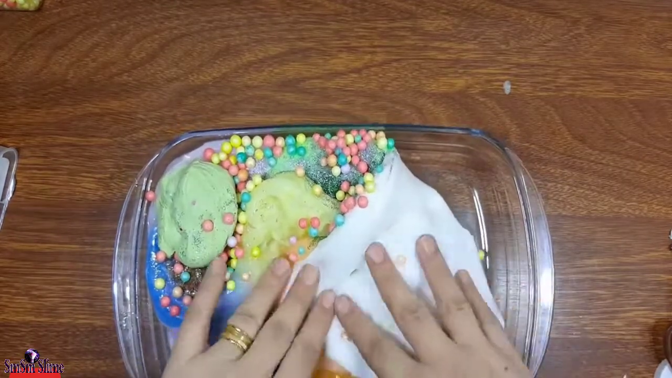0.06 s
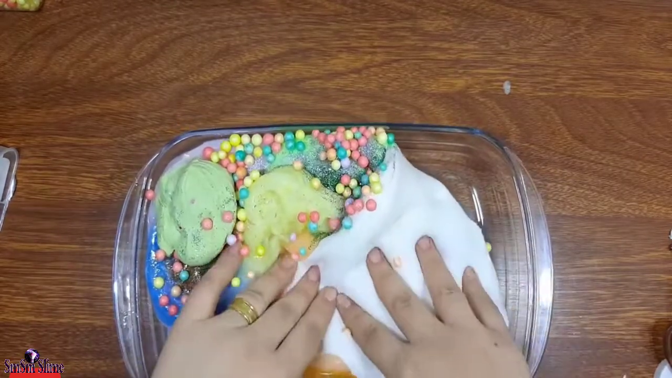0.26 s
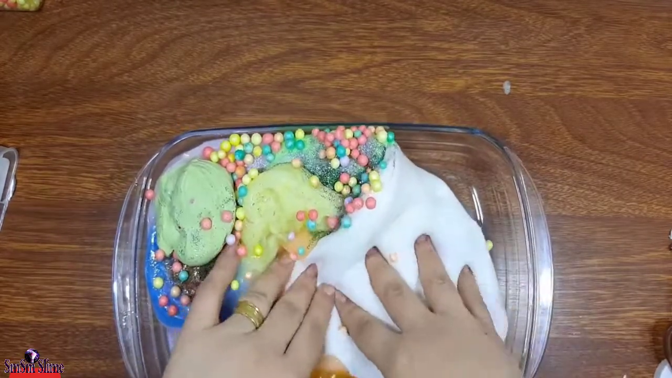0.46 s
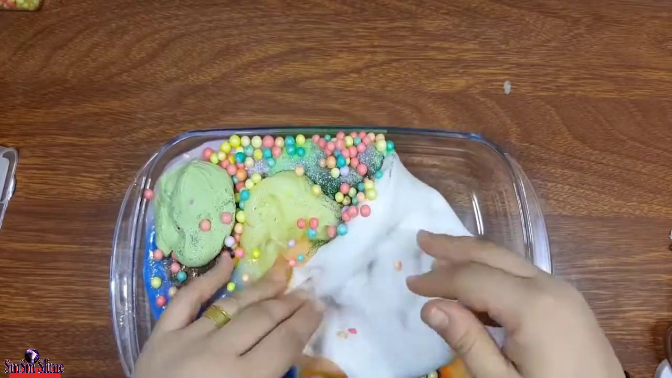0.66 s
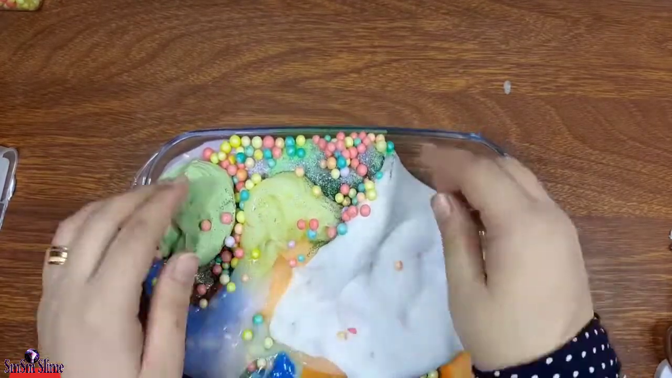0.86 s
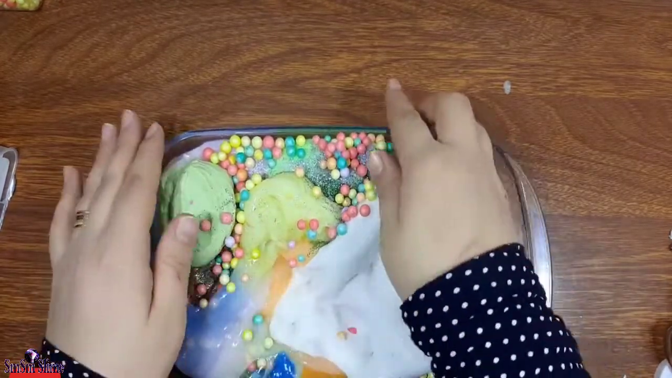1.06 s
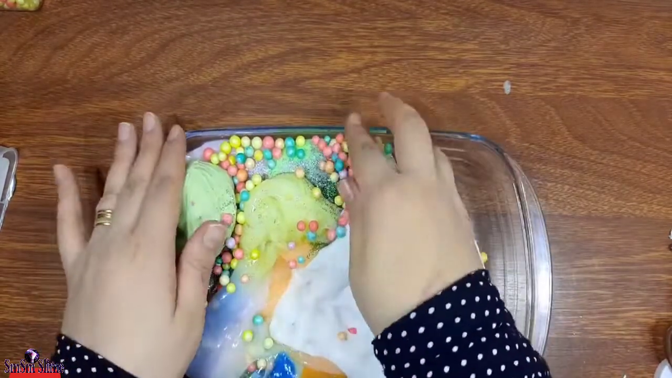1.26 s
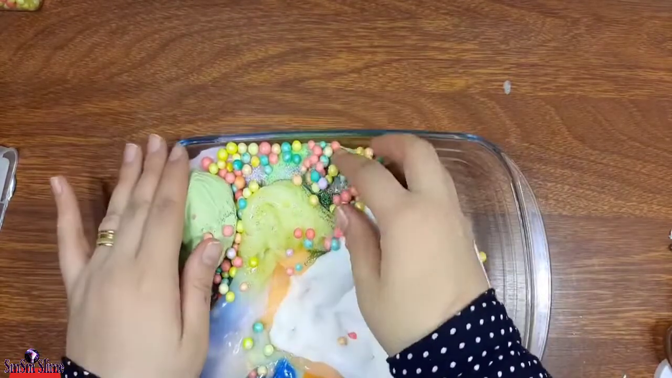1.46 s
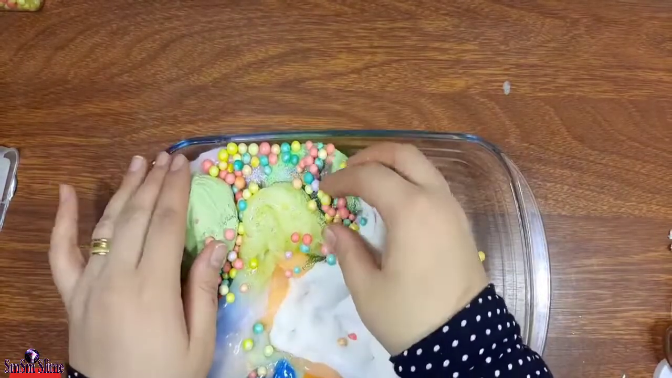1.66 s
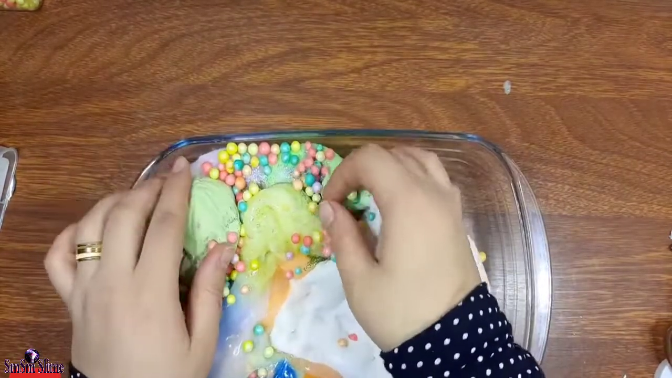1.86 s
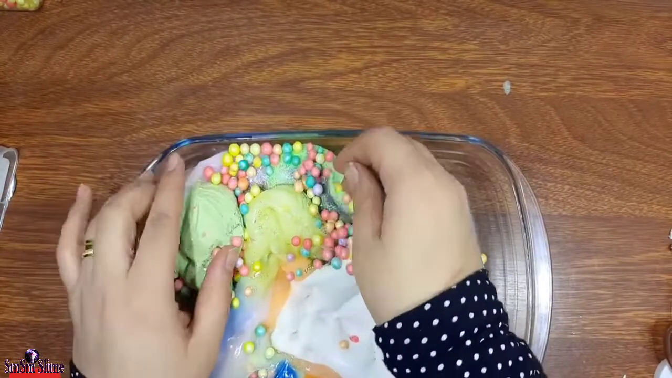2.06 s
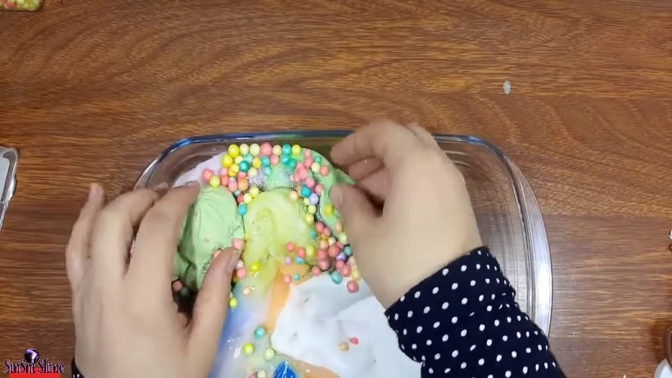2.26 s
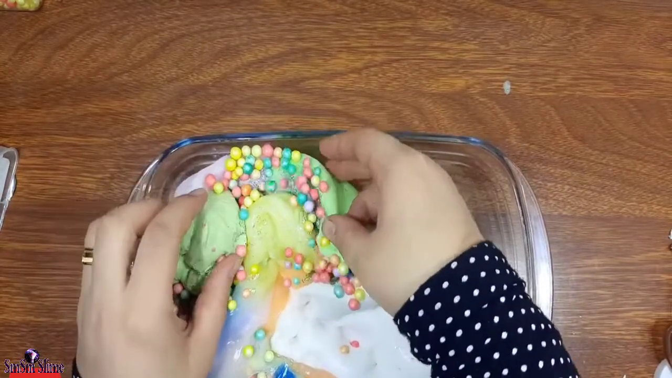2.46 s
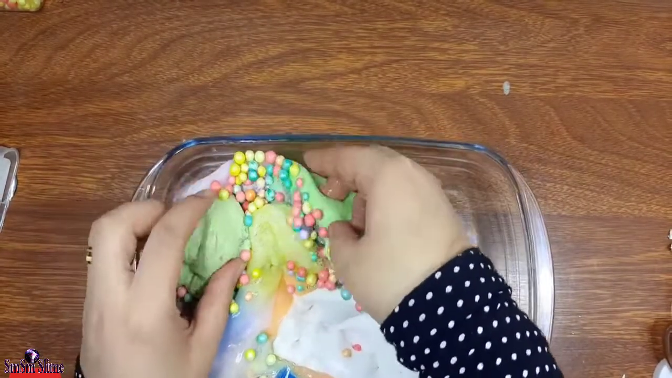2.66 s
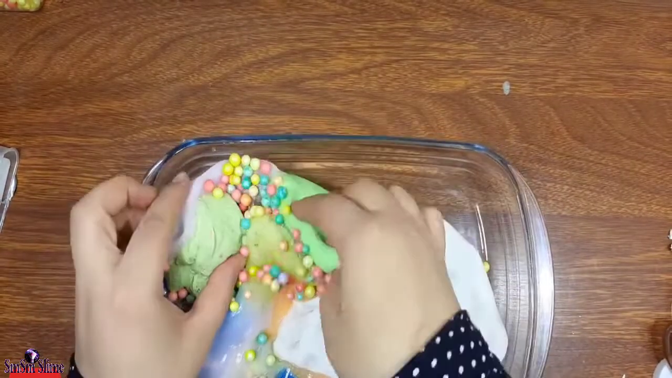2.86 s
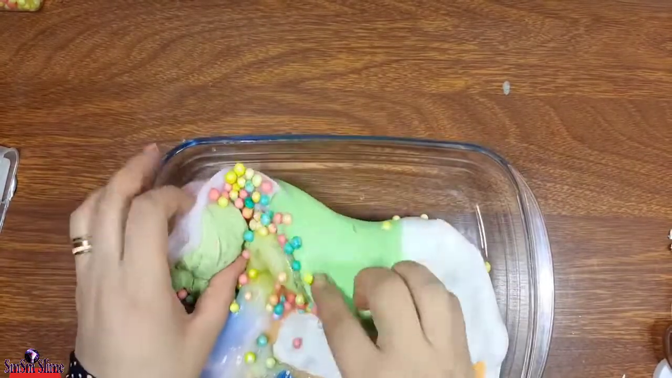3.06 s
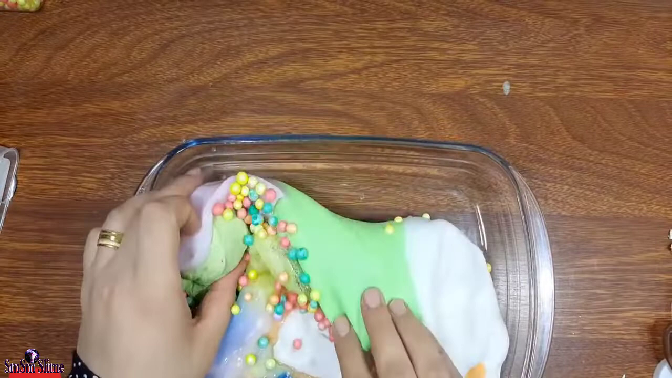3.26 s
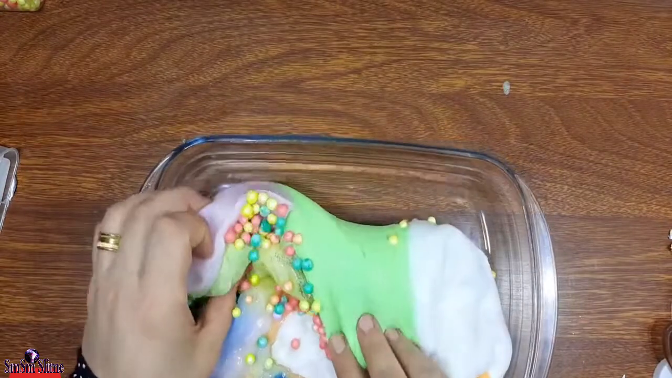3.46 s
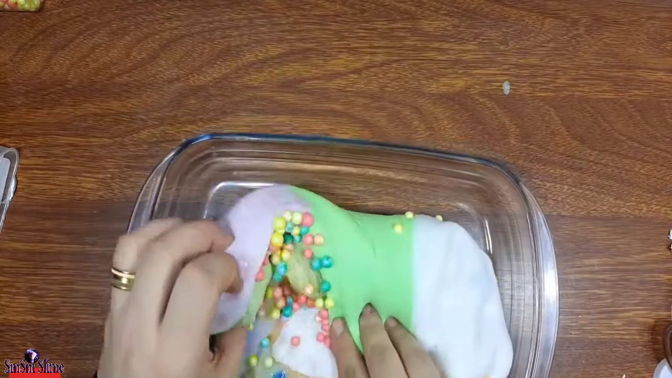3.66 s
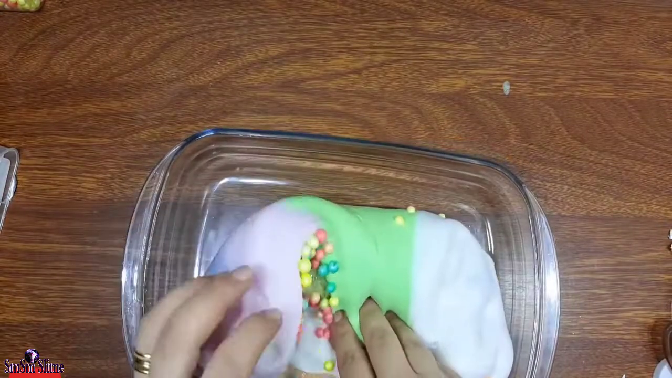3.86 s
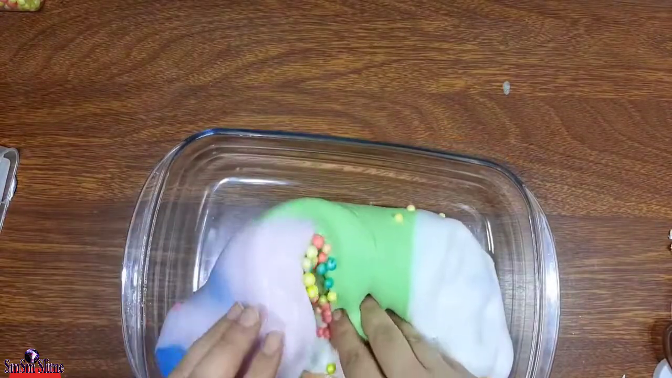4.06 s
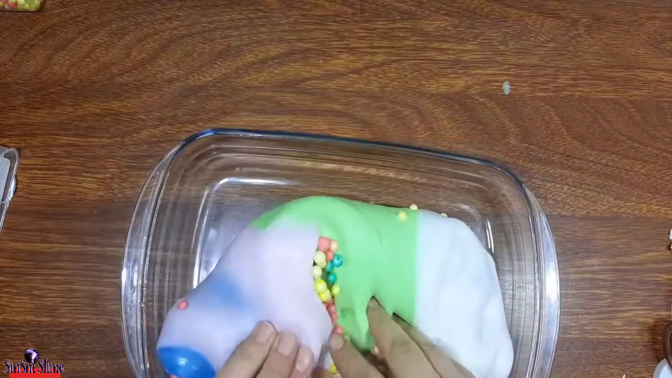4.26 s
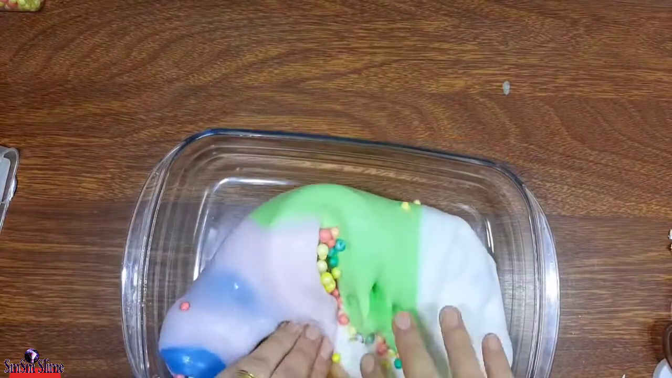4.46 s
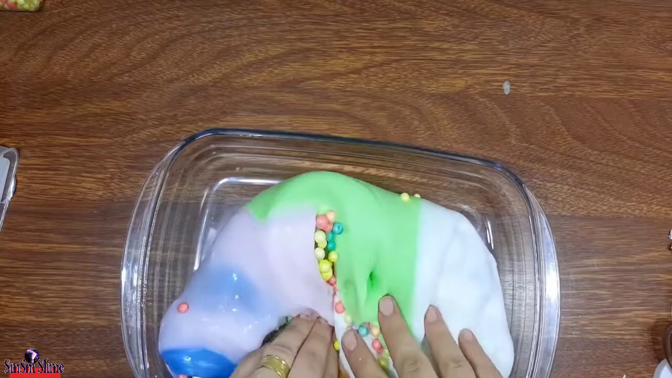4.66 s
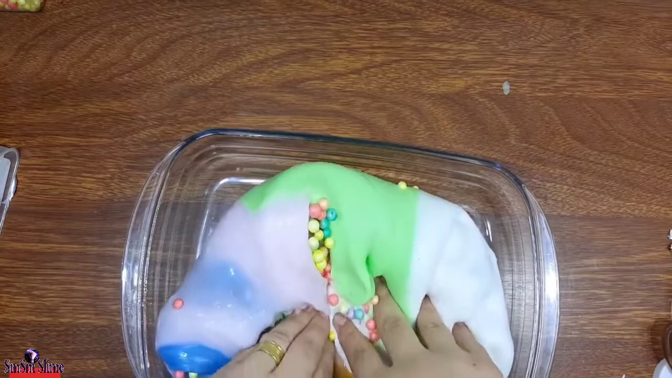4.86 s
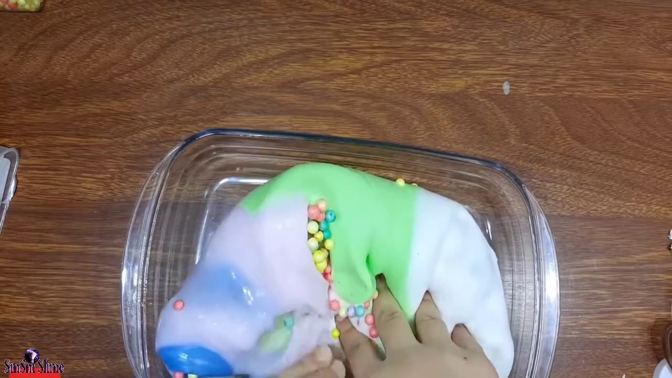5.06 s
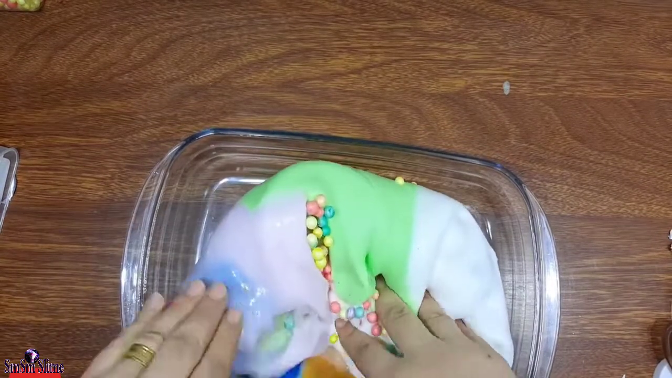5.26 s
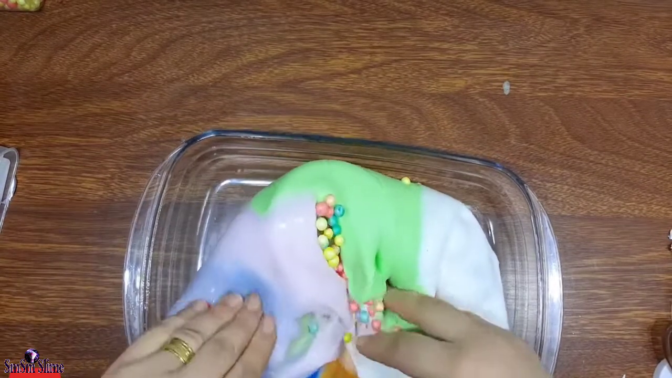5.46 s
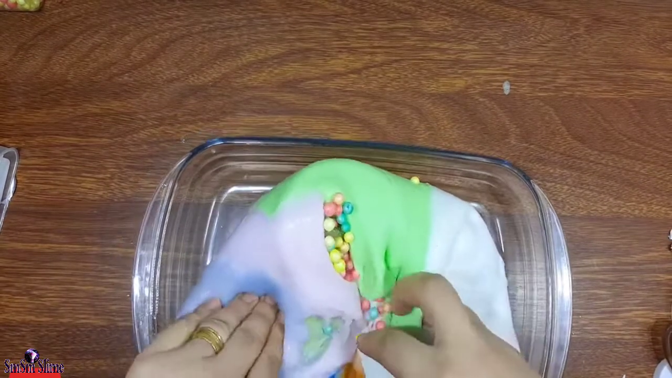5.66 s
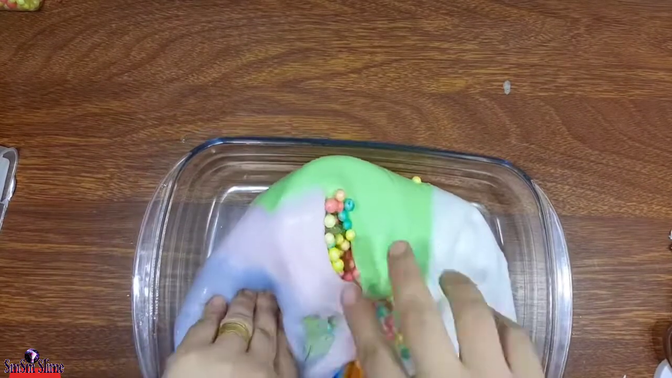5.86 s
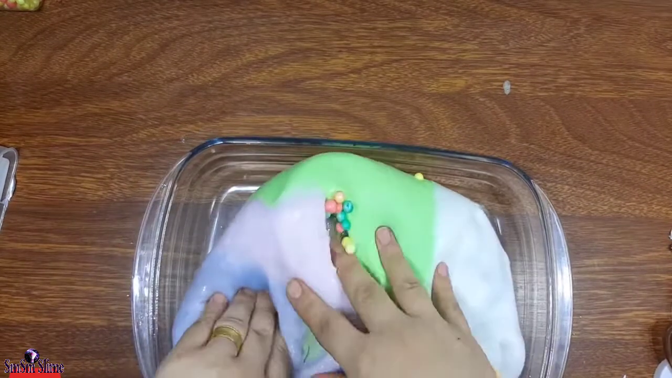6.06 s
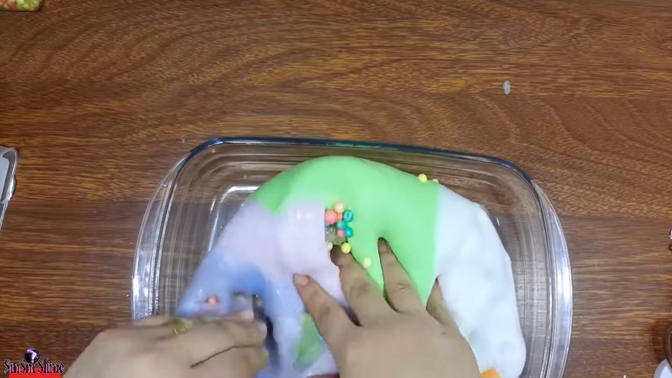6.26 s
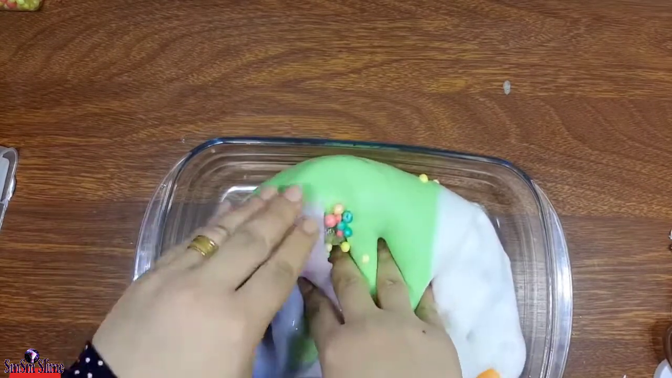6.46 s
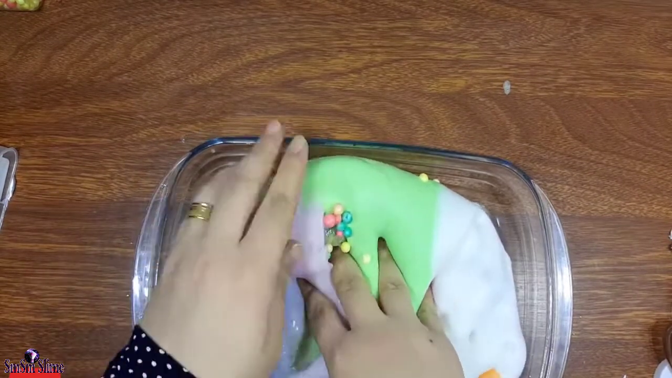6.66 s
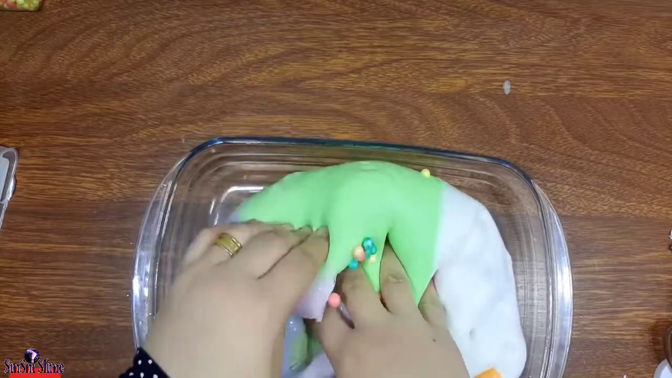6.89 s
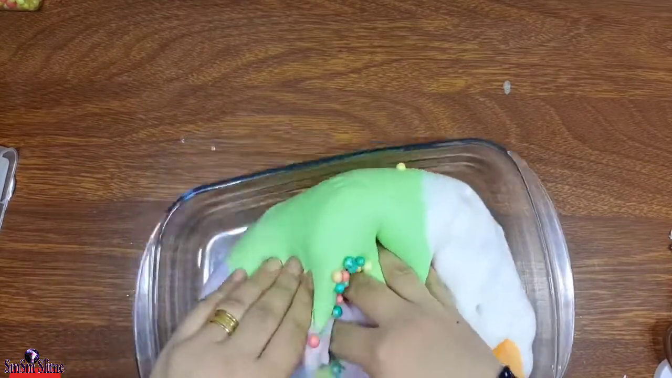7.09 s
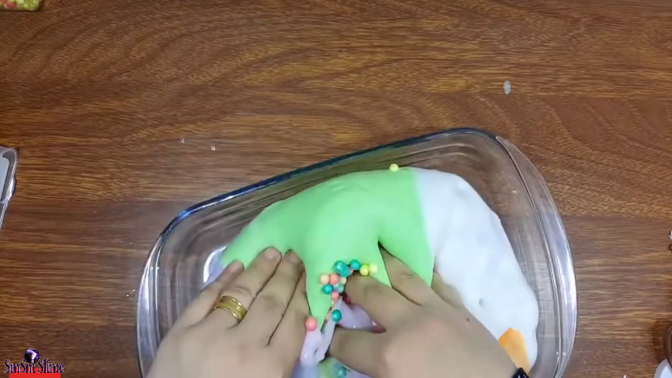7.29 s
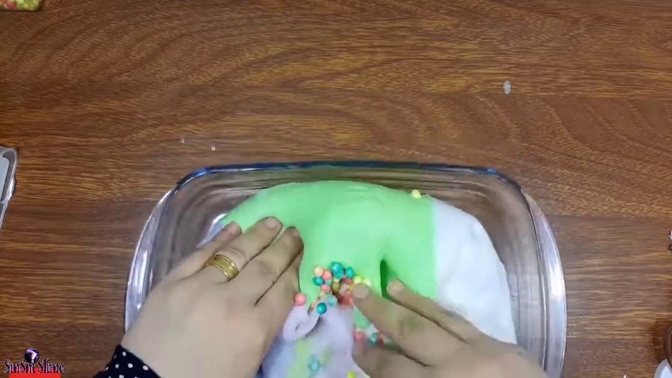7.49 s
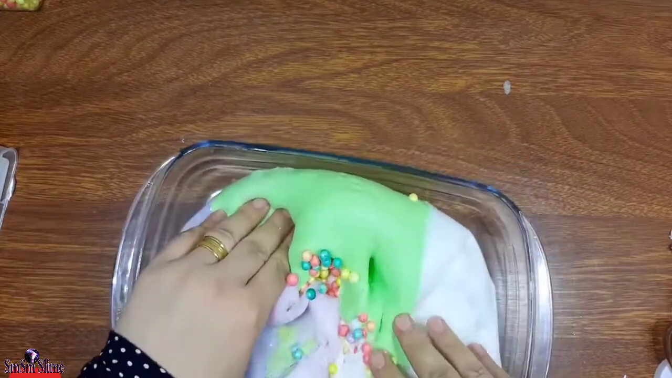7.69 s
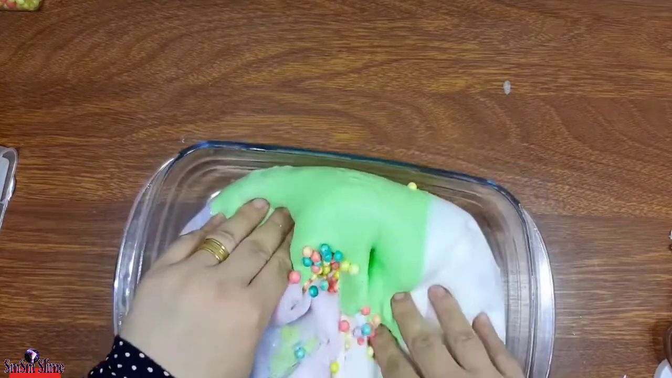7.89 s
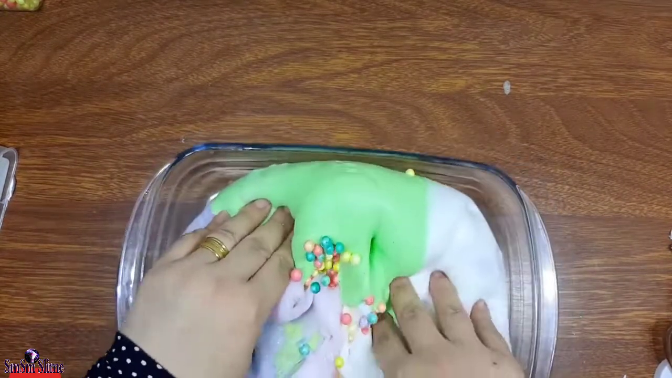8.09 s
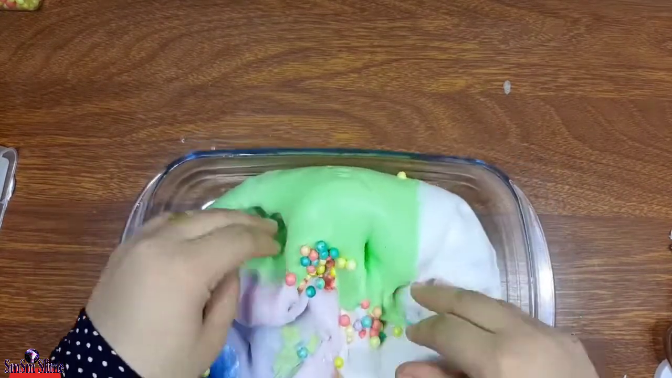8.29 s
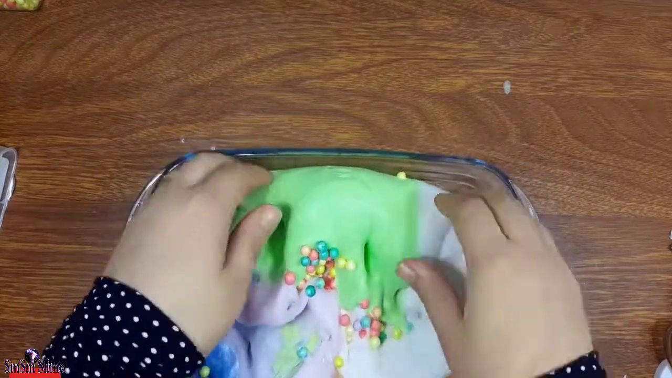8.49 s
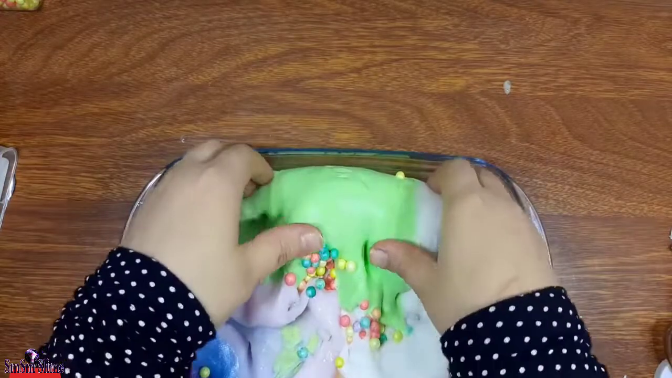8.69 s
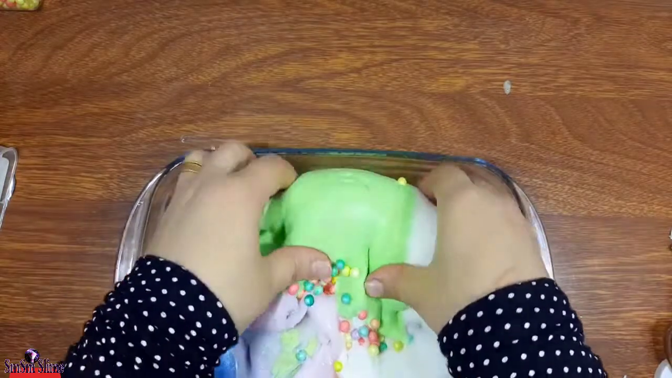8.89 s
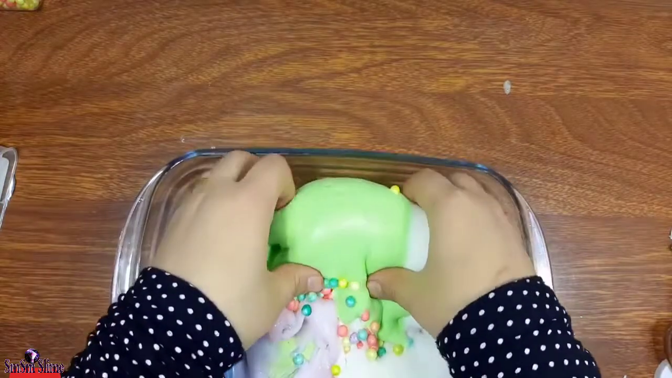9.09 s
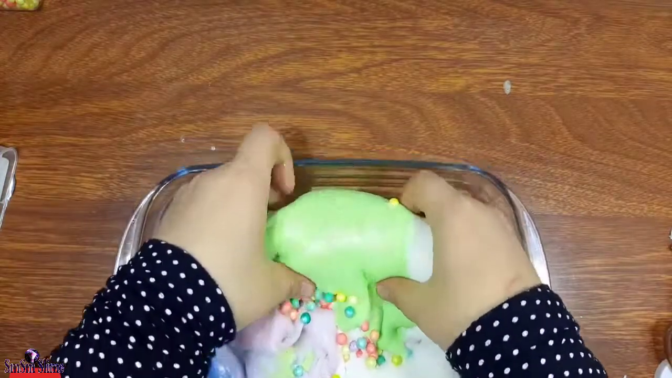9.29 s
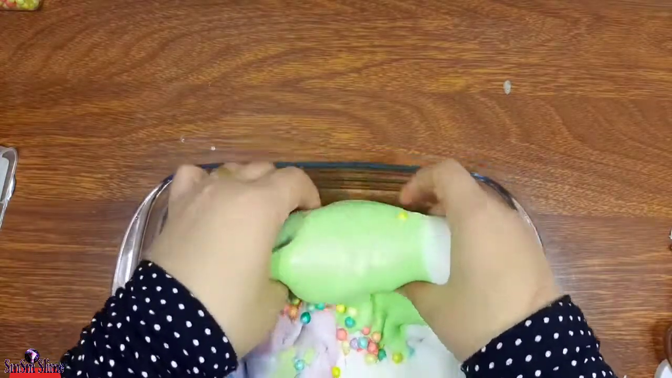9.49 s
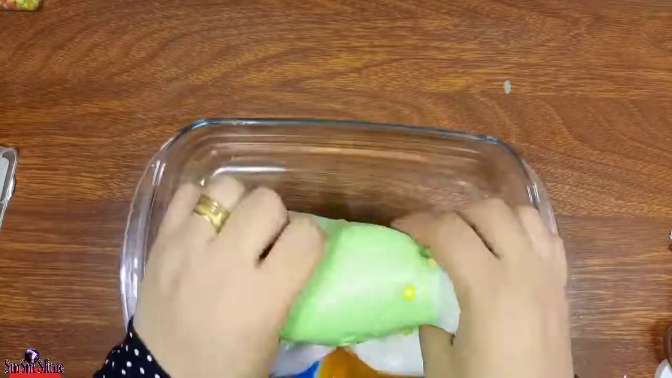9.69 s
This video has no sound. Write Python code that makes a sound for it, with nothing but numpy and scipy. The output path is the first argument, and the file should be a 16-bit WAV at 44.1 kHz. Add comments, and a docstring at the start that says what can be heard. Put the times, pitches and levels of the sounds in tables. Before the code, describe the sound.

Very close stereo, quiet room with faint low rumble and hiss. From 0 to 0.5 s, hands press beaded slime with light crackles, a small squelch and tiny pops. At 0.7 s the glass dish thumps low on the wooden table. From 1.2 to 3.2 s, sparse fine fizz, ticks and faint bumps. At 3.8 s crackling thickens with a soft wet slip; a crisp snap comes at 4.55 s. At 5.15 s a juicy squelch with a pop and table bump. Around 6.1-6.35 s, a dense crunchy, wet squeeze, then a brief lull. From 7.15 to 7.75 s comes the loudest passage: sharp snapping pops, thick squelches, dish knocks and scraping, a faint glassy ring. A smaller crackle and pop at 8.3 s, then quiet fizzing and soft bumps. From 9.4 s to the end, bright pops, tearing crackle and a final squelch with a dish drag.

```python
"""Two hands knead sticky slime with foam beads in a glass dish on a wooden table, close to a stereo microphone.
Tiny films tear in a bright fizz: random clicks with dense echoes, shaped by each squeeze.
Wet slips squelch, air pockets and the glass dish ring (noise and slips through drifting resonances),
and bubbles pop (short sine snaps with cracks).
Each push rocks and drags the dish, so slips ring the table modes; a faint steady noise lies beneath."""
import sys
import numpy as np
from scipy import signal
from scipy.fft import rfft, irfft, next_fast_len
from scipy.io import wavfile
from scipy.ndimage import uniform_filter1d

SR = 44100
rng = np.random.default_rng(int(sys.argv[2]) if len(sys.argv) > 2 else 0)


def pcm_store(signal):
    """Save signal as 16-bit PCM."""
    levels = np.round(np.clip(np.atleast_2d(signal), -1, 1) * 32767)
    wavfile.write(sys.argv[1], SR, levels.astype(np.int16).T)


N = 429534  # samples

# bursting bubbles: (time [s], snap peak [dB], pitch [Hz], snap length [cycles, at least 0.4 used],
# wide crack against snap [dB], burst t60 [s], left-right [dB])
BURSTS = [(0.178, -48, 13800, 1.8, -3, 0.027, -10), (0.261, -38, 1950, 0.42, -11, 0.051, 4),
          (0.308, -42, 2300, 1.8, 0, 0.035, 3), (0.333, -36, 1690, 0.73, -17, 0.04, 6),
          (0.339, -40, 2180, 1.5, -12, 0.04, 7), (0.351, -48, 2280, 2.7, -12, 0.035, 3),
          (0.395, -53, 1600, 1.5, -12, 0.02, 4), (0.441, -44, 7200, 2, 1.5, 0.038, -4),
          (0.85, -67, 1410, 1.6, 6, 0.041, 2), (1.442, -41, 6650, 3.3, -5, 0.034, 3),
          (1.475, -38, 3660, 0.91, -1.5, 0.053, -1), (1.514, -49, 6880, 1.1, 6, 0.035, -4),
          (1.6, -50, 2220, 4, 1, 0.053, 11), (2.482, -42.5, 12400, 2.6, -15, 0.041, -3),
          (3.048, -44, 1300, 0.85, -15, 0.2, 7), (3.44, -51, 5550, 2, -6, 0.027, -2),
          (3.556, -43, 11500, 1, -4, 0.03, -7), (3.532, -47.5, 1390, 2.4, -19, 0.14, 2),
          (3.748, -37, 12300, 0.36, -12, 0.023, -4), (3.831, -52, 1350, 1.7, -15, 0.06, -1),
          (3.857, -40.5, 1250, 2.9, -4, 0.089, -1), (3.893, -44, 1250, 2.5, -8, 0.042, -3),
          (3.972, -42, 12000, 4, -17, 0.038, -9), (3.979, -48, 1250, 0.81, -8, 0.04, 0),
          (4.21, -39, 12200, 3.9, -16, 0.038, -11), (4.457, -48, 6300, 0.88, -8, 0.041, -4),
          (4.536, -43, 11600, 2, -9, 0.038, -9), (4.552, -31.5, 6060, 0.6, 5, 0.037, 2),
          (4.631, -52, 2800, 2, -6, 0.03, 1), (4.697, -44.5, 1100, 0.71, -15, 0.03, 8),
          (4.719, -51, 1300, 1.8, -12, 0.04, 1), (4.754, -47, 1460, 1.8, -12, 0.05, 3),
          (4.826, -54, 1700, 1.5, -6, 0.03, 1), (4.692, -45, 2660, 4.4, 9.5, 0.048, -2),
          (4.976, -42.5, 1650, 1.2, -15, 0.066, 5), (5.034, -45, 1580, 0.91, -8, 0.026, 7),
          (5.078, -44, 13400, 1.6, -2, 0.027, 0.0), (5.16, -31.5, 1300, 1, 2.5, 0.033, -4),
          (5.389, -51, 12500, 0.81, -13, 0.041, -2.0), (5.868, -42, 8070, 1.2, -4, 0.028, 6),
          (5.903, -50.5, 980, 1.5, 2, 0.03, 2), (6.075, -47, 3770, 2.1, -16, 0.11, -1),
          (6.095, -45, 1870, 5.3, 12.5, 0.045, 7), (6.124, -35, 13600, 1.6, -8, 0.043, -16),
          (6.129, -39.5, 877, 0.87, -6, 0.044, 9), (6.188, -41, 3140, 1.7, 10, 0.054, -7),
          (6.275, -34.5, 1770, 0.63, -11, 0.035, 16), (6.309, -49, 2560, 2, 0, 0.035, -5),
          (6.864, -44.5, 13900, 1.6, -7, 0.049, -9), (7.053, -37, 11800, 2, -4, 0.097, -4),
          (7.157, -40.5, 2520, 1.5, 11, 0.029, 0), (7.178, -22, 5340, 0.48, -6, 0.048, 0),
          (7.309, -22, 2000, 0.46, -20, 0.017, 0), (7.333, -45.5, 1310, 1.9, 7, 0.035, -5),
          (7.419, -43, 1330, 1.6, 1, 0.033, -4), (7.477, -19, 4300, 0.75, -6, 0.031, -1),
          (7.699, -29, 13000, 2.3, -1.5, 0.073, -2), (7.923, -44.5, 5180, 5, 11, 0.042, -2),
          (8.251, -48, 10800, 2.3, -13, 0.028, -14), (8.297, -30.5, 8000, 1, -11, 0.03, -2),
          (8.298, -49.5, 1180, 2.2, -20, 0.044, 3), (8.325, -49, 1150, 2.5, -20, 0.03, 1),
          (8.347, -47, 2770, 4, -20, 0.03, 3), (8.363, -41.5, 3000, 2, -20, 0.022, 5),
          (8.369, -46.5, 2270, 4, -20, 0.04, 5), (8.833, -43.5, 11800, 2.3, -16, 0.038, 0),
          (8.867, -54, 1800, 3, -12, 0.05, 0), (8.93, -49, 1900, 3.3, -12, 0.035, -2),
          (9.005, -59, 2050, 2.8, -12, 0.04, 0), (9.076, -40, 13300, 2.2, 4, 0.035, -3),
          (9.231, -46, 4550, 1.8, -10, 0.072, -4), (9.424, -43, 2360, 1.5, -14, 0.028, 4),
          (9.486, -27.5, 5100, 1.7, -0.5, 0.049, -1), (9.599, -34.5, 8050, 1.4, 1, 0.051, 0),
          (9.664, -46, 2000, 1.8, 14.5, 0.031, -2), (9.712, -36.5, 2200, 2.4, 11, 0.048, -0.5)]
# fingers squeeze or peel the slime: (peak time [s], rise [s], fall [s], fizz [dB], dull tearing [dB],
# squelch [dB], deep squelch [dB], left-right [dB])
SQUEEZE_EVENTS = [(0.146, 0.0049, 0.03, -74, -65.5, -78, -89, 9),
                  (0.181, 0.032, 0.077, -57, -58, -79, -82, 0),
                  (0.262, 0.011, 0.16, -49.5, -51.5, -70, -64, -1),
                  (0.335, 0.05, 0.068, -67, -57, -48.5, -57, 5),
                  (0.436, 0.26, 0.066, -66, -60, -81, -96, 1),
                  (0.655, 0.11, 0.037, -57.5, -65.5, -85, -83, -1),
                  (0.724, 0.11, 0.063, -53.5, -58.5, -64.5, -67, -0.5),
                  (1.275, 0.063, 0.12, -48.5, -62, -69, -75.5, -1.5),
                  (1.447, 0.11, 0.039, -54.5, -58, -83, -74, -1),
                  (1.474, 0.0081, 0.11, -60.0, -61, -62.5, -68.5, 2.0),
                  (1.6, 0.0089, 0.11, -85.0, -64, -67, -80, 2.0),
                  (1.83, 0.23, 0.11, -57, -67.5, -82, -83.0, 1),
                  (2.488, 0.29, 0.092, -59, -77, -80, -85.0, 0),
                  (2.672, 0.26, 0.046, -55, -72.5, -80, -98, -3),
                  (3.055, 0.11, 0.046, -52, -59.5, -61, -62.5, 1),
                  (3.213, 0.28, 0.071, -49, -60.5, -63.5, -71.5, -2),
                  (3.532, 0.009, 0.051, -84.0, -89, -59.5, -60, 0.0),
                  (3.856, 0.041, 0.13, -44, -49, -54, -69, -3),
                  (4.048, 0.067, 0.039, -56, -59.5, -68.5, -71, -4),
                  (4.211, 0.023, 0.032, -47.5, -62, -70, -76, -4),
                  (4.279, 0.056, 0.085, -57, -69, -73.5, -75.5, -2),
                  (4.368, 0.085, 0.079, -55.5, -67.5, -77.5, -79, -3),
                  (4.458, 0.006, 0.066, -92, -63, -70.0, -66, -1.0),
                  (4.559, 0.061, 0.028, -39.5, -51, -59, -68.5, -4),
                  (4.63, 0.008, 0.085, -62, -53.5, -63, -68, 0),
                  (4.75, 0.29, 0.18, -51.5, -52, -57.5, -60.5, -1),
                  (4.978, 0.007, 0.047, -62, -80, -63, -74, 3), (5.037, 0.31, 0.2, -57, -77, -66, -72, -2),
                  (5.154, 0.042, 0.056, -44.0, -44, -44.5, -43, 0.5),
                  (5.389, 0.009, 0.21, -67, -83, -70.5, -75, -1.0),
                  (5.458, 0.022, 0.32, -58.5, -62, -74, -71.5, -1),
                  (5.651, 0.14, 0.15, -81, -64, -61.5, -65, 3), (5.8, 0.008, 0.1, -56, -66, -90, -90, -4),
                  (5.87, 0.013, 0.061, -61, -54, -64, -66.5, 2.0),
                  (5.903, 0.013, 0.099, -65, -57, -61.5, -66, 2.0),
                  (6.096, 0.025, 0.25, -46.5, -50.5, -50.5, -61, -1.5),
                  (6.195, 0.061, 0.032, -41.5, -43, -43.5, -55.5, -1.5),
                  (6.278, 0.01, 0.051, -54, -47, -52, -55, -4),
                  (6.313, 0.066, 0.06, -44.5, -45, -42, -44.5, 1),
                  (6.355, 0.16, 0.03, -61, -47.5, -52, -50, 0),
                  (6.793, 0.076, 0.018, -58.5, -74, -69.5, -79, -2),
                  (6.919, 0.071, 0.17, -56, -52.5, -57, -64.5, -2.0),
                  (7.055, 0.046, 0.19, -52, -57.5, -58.5, -68, -2),
                  (7.158, 0.0052, 0.06, -64, -47, -58, -46, -2),
                  (7.182, 0.047, 0.16, -56, -47.5, -43.5, -44.5, -4),
                  (7.421, 0.071, 0.22, -53, -52.5, -55, -50.5, -1.5),
                  (7.642, 0.056, 0.032, -63, -47.5, -43, -50, 0),
                  (7.7, 0.024, 0.031, -45, -41, -55, -62, 0), (7.712, 0.37, 0.049, -73, -51, -44, -46.5, 1),
                  (7.924, 0.0096, 0.24, -61, -68.5, -73, -74, 0.0),
                  (7.98, 0.12, 0.044, -68, -57.5, -74, -71, -4),
                  (8.196, 0.019, 0.027, -63, -81, -65.5, -99, 0.0),
                  (8.297, 0.032, 0.075, -51, -56, -62, -69, 0),
                  (8.367, 0.28, 0.078, -54.5, -53, -57, -65, -1),
                  (8.862, 0.087, 0.37, -50, -71, -63.5, -71, -0.5),
                  (9.085, 0.23, 0.19, -69.5, -58.5, -78, -81.5, -0.5),
                  (9.148, 0.082, 0.3, -56.5, -59.5, -66.5, -81, -1),
                  (9.237, 0.038, 0.041, -90, -60, -61, -80, 0.0),
                  (9.442, 0.065, 0.046, -53, -44.5, -50, -54.5, -2),
                  (9.484, 0.013, 0.073, -68, -46.5, -53.5, -62, -9),
                  (9.599, 0.022, 0.077, -52.5, -49.5, -56.5, -57, -3),
                  (9.665, 0.0061, 0.033, -62, -57, -64, -65, 0),
                  (9.723, 0.089, 0.047, -64, -47.5, -43.5, -48, 2)]
# slime creeps and crackles between squeezes:
# (time [s], fizz [dB], dull tearing [dB], squelch [dB], deep squelch [dB])
CREEP_LEVELS = [(0.0, -77, -100.0, -100.0, -100.0), (1.16, -97, -100.0, -85.5, -84),
                (1.6, -62.5, -75, -100.0, -99.0), (2.03, -65.5, -79, -80, -78.5),
                (2.41, -67, -88, -91, -84.5), (3.72, -52.5, -61, -69.0, -78),
                (3.93, -59, -67.5, -72.5, -76.5), (5.32, -78, -88, -100.0, -100.0),
                (5.82, -55.5, -64.0, -74.5, -81), (6.19, -81, -100.0, -100.0, -99.0),
                (7.46, -57.5, -78, -73, -71), (8.45, -87, -94, -90.5, -101),
                (8.71, -106, -100.0, -77, -77.5), (9.74, -62, -60, -70.5, -100.0)]


def gain_of(db):
    """Decibels to an amplitude factor."""
    return 10 ** (np.asarray(db) / 20)


def power_of(db):
    """Decibels to a power factor."""
    return gain_of(2 * np.asarray(db))


def evened(x):
    """Scales to rms 1."""
    return x / np.sqrt(np.mean(x ** 2) + 1e-20)


def smooth_noise(size):
    """Slow random curve of rms 1: white noise through two moving averages of size samples."""
    once = uniform_filter1d(rng.standard_normal(N), size=size)
    return evened(uniform_filter1d(once, size=size))


def coloured(x, points):
    """Filters x by a response through (frequency [Hz], level [dB]) points, then scales to rms 1."""
    size = next_fast_len(x.shape[-1])
    point_hz, point_db = np.transpose(points)
    hz = np.fft.rfftfreq(size, 1 / SR)
    response_db = np.interp(np.log(hz + 1), np.log(point_hz + 1), point_db)
    filtered = irfft(rfft(x, size) * gain_of(response_db), size)
    return evened(filtered[..., :x.shape[-1]])


def resonate(x, hz, width_hz):
    """Shifts the curve hz down to zero, smooths, and shifts back: a resonance of gain 1."""
    turn = np.exp(2j * np.pi * np.cumsum(hz * np.ones(x.shape[-1])) / SR)
    r = np.exp(-np.pi * width_hz / SR)
    smooth = signal.lfilter([1 - r], [1, -r], x / turn + 1e-18)
    return 2 * (turn * smooth).real


def rung(x, modes):
    """Rings fixed (frequency [Hz], width [Hz], level [dB]) modes below SR / 16, at rms 1."""
    size = next_fast_len(N + SR)
    low = rfft(x, size)[:, :size // 16]
    hz = np.arange(low.shape[1]) * SR / size
    body = np.zeros(len(hz), complex)
    for k, (mode_hz, width_hz, db) in enumerate(modes):
        offset = (hz - mode_hz) / width_hz
        body += (-1) ** k * gain_of(db) / (1 + 2j * offset) / (1 + .7j * offset)
    return evened(irfft(low * body, size)[:, :N])


def sides(pan_db):
    """Left and right gains for a left-right difference, fixed or one value a sample."""
    half_db = np.atleast_1d(pan_db) / 2
    return gain_of(np.array([half_db, -half_db]))


def clicks(per_s, spread_db, clump_db):
    """Random clicks at rms 1, a few large; the sizes swell in short clumps."""
    clumps = smooth_noise(350)
    size_db = spread_db * np.minimum(rng.exponential(1, N), 4) + clump_db * clumps
    signs = rng.choice([-1, 1], N)
    return evened(gain_of(size_db) * signs * (rng.random(N) < per_s / SR))


def dish(x, t60_s, echo_db, shimmer):
    """Clicks reach the left side 5 samples earlier and trail dense echoes off glass and table."""
    r = gain_of(-120 / (t60_s * SR))
    energy = signal.lfilter([1 - r], [1, -r], x ** 2)
    direct = np.array([x, np.roll(x, 5)])
    return direct + gain_of(echo_db) * np.sqrt(energy) * shimmer


def swells(events, between):
    """Layer powers: each event swells to its peak and dies away, above a slow background."""
    swell_db = 20  # climb over one rise time, drop over one fall time
    rounding = 0.02  # share of rise or fall over which the top is rounded
    t = np.arange(0, N / SR, 1 / 500)
    columns = np.transpose(events)
    peak_s, rise_s, fall_s = columns[:3, :, None]
    away = np.where(t < peak_s, (peak_s - t) / rise_s, (t - peak_s) / fall_s)
    shape = power_of(-swell_db * (np.hypot(away, rounding) - rounding))
    slow_s, *slow_db = np.transpose(between)
    slow = power_of([np.interp(t, slow_s, db) for db in slow_db])
    peaks = power_of(columns[3:3 + len(slow)])
    first_layer_events = shape * peaks[0][:, None]
    return t, first_layer_events, peaks @ shape + slow


def levels(t, power):
    """Power curves as dB, one value a sample."""
    return [np.interp(np.arange(N) / SR, t, 10 * np.log10(p)) for p in power]


def table():
    """Uneven slips of the dish ring the table modes; each side hears them a little differently."""
    # dish rocks or drags: (peak time [s], rise [s], fall [s], boom [dB], scrape [dB])
    push_events = [(0.006, 0.16, 0.049, -58, -71.5), (0.136, 0.017, 0.24, -61.5, -77),
                   (0.625, 0.027, 0.21, -49, -66), (0.702, 0.04, 0.093, -32.5, -54.5),
                   (0.85, 0.011, 0.059, -70, -67.5), (1.254, 0.032, 0.13, -63.5, -74),
                   (1.506, 0.096, 0.044, -57.5, -61.5), (1.605, 0.016, 0.055, -70.5, -93),
                   (2.27, 0.017, 0.1, -66, -73), (2.333, 0.053, 0.041, -50, -59.5),
                   (2.627, 0.021, 0.087, -53.5, -70.5), (3.322, 0.14, 0.15, -63, -88),
                   (3.685, 0.018, 0.065, -62.5, -76), (3.737, 0.013, 0.082, -59.5, -68.5),
                   (3.953, 0.21, 0.28, -58, -93), (4.361, 0.21, 0.017, -74, -92.0),
                   (4.449, 0.0065, 0.041, -56, -59), (4.489, 0.022, 0.3, -55, -67.5),
                   (4.765, 0.22, 0.051, -55, -66), (5.165, 0.037, 0.057, -41.5, -46),
                   (5.395, 0.027, 0.062, -55, -63), (5.466, 0.021, 0.19, -54.5, -84),
                   (5.651, 0.099, 0.054, -42, -47.5), (5.905, 0.036, 0.078, -45, -71),
                   (6.134, 0.043, 0.2, -42, -53), (6.307, 0.019, 0.092, -46, -44),
                   (6.978, 0.25, 0.13, -61.5, -72), (7.176, 0.038, 0.15, -37.5, -33),
                   (7.239, 0.024, 0.092, -36.5, -42), (7.395, 0.012, 0.61, -39.5, -61),
                   (7.577, 0.074, 0.16, -39.5, -36.5), (7.619, 0.26, 0.16, -47.5, -36.0),
                   (8.189, 0.28, 0.048, -70.5, -90), (8.353, 0.054, 0.1, -44.5, -57.5),
                   (8.601, 0.032, 0.1, -62, -66.5), (8.663, 0.011, 0.1, -53, -59.5),
                   (8.833, 0.026, 0.18, -60, -62), (8.958, 0.012, 0.11, -54.5, -66),
                   (9.181, 0.036, 0.13, -40, -52.5), (9.399, 0.036, 0.21, -47, -50.5),
                   (9.695, 0.066, 0.37, -40, -35)]
    # hands lean on the dish between pushes: (time [s], boom [dB], scrape [dB])
    lean_levels = [(0, -80, -106.5), (1.25, -78, -85.5), (2.8, -81, -87), (3.41, -72.5, -81),
                   (4.9, -80, -85), (6.7, -79, -90), (7.5, -55, -81), (7.95, -81, -77), (9.74, -71, -90)]
    # lowest table modes: (frequency [Hz], width [Hz], level [dB])
    boom_modes = [(73.6, 87, -8.5), (102.7, 44, 3.5), (124, 40.7, 0)]
    # higher modes of the scrape: (frequency [Hz], width [Hz], level [dB])
    scrape_modes = [(174.5, 54, 2.5), (260, 60, 1), (400, 63, -4), (461, 58, -8.5), (662, 88, -8)]
    t, _, power = swells(push_events, lean_levels)
    boom_db, scrape_db = levels(t, power)
    # a sudden push also knocks the dish once on the wood
    knock_db, sudden_s = 24.5, 0.053  # size over the slips, rise scale above which knocks fade
    peak_s, rise_s = np.transpose(push_events)[:2]
    knocks = np.zeros(N)
    knocks[(peak_s * SR).astype(int)] = gain_of(knock_db) * np.exp(-(rise_s / sudden_s) ** 2)
    out = np.zeros((2, N))
    # modes, level [dB], noise of each side's own, left lag [s], left-right [dB]
    layers = ((boom_modes, boom_db, .25, .0009, 4.5), (scrape_modes, scrape_db, .55, .0003, 2.2))
    for modes, level_db, own, lag_s, pan_db in layers:
        slips = clicks(450, 2.2, clump_db=1.3) + knocks + own * rng.standard_normal((2, N))
        overall = np.sqrt(np.mean(power_of(level_db)))
        ring = rung(slips * gain_of(level_db), modes) * overall
        # the wave in the wood reaches the left side later
        ring[0] = np.pad(ring[0], (round(SR * lag_s), 0))[:N]
        out += ring * sides(pan_db)
    return signal.sosfilt(signal.butter(2, 62, "high", fs=SR, output="sos"), out)


def patchy(patch_db):
    """Noise for both sides with random, briefly louder narrow bands."""
    a, b, c, d, patches = rng.standard_normal((5, 513, N // 512 + 4))
    patches = uniform_filter1d(patches, size=3, axis=1)
    patches = evened(uniform_filter1d(patches, size=2, axis=0))
    spectra = np.array([a + 1j * b, c + 1j * d]) * gain_of(patch_db * patches)
    noise = signal.istft(spectra, window="cosine", nperseg=1024, noverlap=512)[1]
    return evened(noise[:, :N])


def fizz(shimmer):
    """Small films tear brightly, large ones duller; squeezes shift the side by their share of power."""
    # small-film spectrum: (frequency [Hz], level [dB])
    bright_points = [(3000, -45), (7000, -5.5), (9000, -5.5), (11000, 1), (13500, 5), (15200, -0.5),
                     (16500, 5)]
    # large-film spectrum: (frequency [Hz], level [dB])
    dull_points = [(1200, -66.5), (2800, -12.5), (4200, 8.5), (6500, 4), (8500, -2), (12000, -0.5)]
    creep_pan_db = -2
    t, each, power = swells(SQUEEZE_EVENTS, CREEP_LEVELS)
    bright_db, dull_db = levels(t, power[:2])
    aside_db = (np.transpose(SQUEEZE_EVENTS)[-1] - creep_pan_db) @ each / power[0]
    pan_db = creep_pan_db + np.interp(np.arange(N) / SR, t, aside_db)
    small = dish(clicks(5400, 1.0, clump_db=1.9), 0.011, echo_db=11.0, shimmer=shimmer)
    large = dish(clicks(3500, 3.2, clump_db=2.0), 0.067, echo_db=7.5, shimmer=shimmer)
    small = coloured(small, bright_points) * gain_of(bright_db)
    large = coloured(large, dull_points) * gain_of(dull_db)
    return (small + large) * sides(pan_db)


def squelch(shimmer):
    """Wet slips of the slime, thin and deep, and the tones of air pockets and glass dish."""
    # thin squelch spectrum: (frequency [Hz], level [dB])
    wet_points = [(500, -70), (1200, 0), (2500, 1.5), (3500, -2.5), (6000, -27)]
    # deep squelch spectrum: (frequency [Hz], level [dB])
    deep_points = [(200, -3), (500, 5.5), (950, 7), (1400, -32.5), (2500, -37)]
    # air pockets, and glass-dish tones near 2300 Hz, that ring as slime slides or the dish drags:
    # (start [s], length [s], pitch [Hz], width [Hz], level [dB])
    ringing_tones = [(0.254, 0.11, 600, 199, -61.5), (0.825, 0.4, 1390, 260, -86.5),
                     (0.866, 0.36, 1990, 200, -92), (1.265, 0.19, 752, 80, -76.5),
                     (2, 0.48, 1400, 300, -83), (2.002, 0.5, 2110, 250, -87.5),
                     (3.01, 0.091, 830, 300, -58), (3.761, 0.26, 1180, 876, -65.5),
                     (3.829, 0.082, 1200, 795, -57.5), (3.878, 0.14, 870, 300, -67.5),
                     (4.155, 0.19, 880, 199, -80), (4.444, 0.049, 550, 300, -73),
                     (4.671, 0.12, 1430, 400, -61.5), (4.975, 0.15, 1280, 704, -68),
                     (5.141, 0.048, 1100, 400, -47.5), (5.568, 0.125, 2260, 300, -67),
                     (5.861, 0.052, 854, 245, -63), (6.27, 0.022, 1800, 400, -42.5),
                     (6.294, 0.065, 840, 503, -61), (6.304, 0.05, 2650, 500, -47),
                     (7.324, 0.22, 1330, 500, -56), (7.601, 0.15, 2310, 300, -54),
                     (7.791, 0.27, 1400, 300, -75.5), (8.501, 0.33, 1370, 320, -79.5),
                     (8.699, 0.36, 1330, 330, -71), (8.858, 0.19, 1900, 320, -68.5),
                     (9.408, 0.057, 2340, 300, -59)]
    deep_pan_db = 4
    wander = 0.018  # rms share by which each tone's pitch drifts
    t, _, power = swells(SQUEEZE_EVENTS, CREEP_LEVELS)
    wet_db, deep_db = levels(t, power[2:])
    slips = evened(dish(clicks(2500, 3.0, clump_db=1.5), 0.067, echo_db=6.5, shimmer=shimmer))
    thin = gain_of(wet_db) * coloured(slips, wet_points)
    deep = gain_of(deep_db) * coloured(slips, deep_points) * sides(deep_pan_db)
    out = thin + deep
    drift = 1 + wander * smooth_noise(1500)
    for start_s, length_s, hz, width_hz, ring_db in ringing_tones:
        at = slice(round(start_s * SR), round((start_s + length_s) * SR))
        # a smooth slide (noise) and the slips together excite each tone
        drive = slips[:, at] + 1.03 * rng.standard_normal(slips[:, at].shape)
        pitch_hz = hz * drift[at]
        ring = evened(resonate(resonate(drive, pitch_hz, width_hz), pitch_hz, width_hz))
        out[:, at] += gain_of(ring_db) * ring * signal.windows.tukey(ring.shape[1], .35)
    return out


def stretch(hush_db, lead_s):
    """A film stretches quietly just before it bursts, so the slime's level dips ahead of each pop."""
    t, burst_s = np.arange(N) / SR, np.sort(np.transpose(BURSTS)[0])
    wait_s = np.append(burst_s, np.inf)[np.searchsorted(burst_s, t)] - t
    return gain_of(hush_db * np.exp(-wait_s / lead_s))


def air():
    """Faint steady noise of room and microphone, low rumble to hiss, partly shared by both sides."""
    # relative spectrum: (frequency [Hz], level [dB per Hz])
    air_points = [(18, -44), (30, -1), (109, -3.5), (227, -26.5), (394, -5.5), (526, -28.5), (889, -22),
                  (1430, -20), (3220, -24), (8740, -29.5), (13700, -18.5), (16500, -52)]
    noise = rng.standard_normal((3, N))
    return gain_of(-78.5) * coloured(noise[:2] + 0.75 * noise[2], air_points)


def pops():
    """A bursting bubble: a snap of a few cycles at its pitch, its echoes in the dish, and a wide crack."""
    out, t = np.zeros((2, N + 3000)), np.arange(3000) / SR
    cracks = rng.standard_normal((len(BURSTS), 2, len(t)))
    for (start_s, db, hz, cycles, crack_db, t60_s, pan_db), crack in zip(BURSTS, cracks):
        fall = gain_of(-60 * t / t60_s) * (1 - np.exp(-t / 0.00081))
        cycles = max(cycles, .4)
        snap = np.sin(2 * np.pi * hz * t) * np.exp(-t * hz / cycles) * (1 - np.exp(-t * hz / 0.25))
        snap = snap / abs(snap).max()
        narrow = resonate(crack, hz, 0.27 * hz / cycles)
        echoes = 0.23 * evened(resonate(narrow, hz, 0.6 * hz / cycles)) * fall
        wide = 0.43 * gain_of(crack_db) * signal.lfilter([1, -.7], 1, crack) * fall
        at = round(start_s * SR)
        out[:, at:at + len(t)] += gain_of(db) * sides(pan_db) * (snap + echoes + wide)
    return out[:, :N]


def scene():
    """All sources at the microphone."""
    shimmer = patchy(patch_db=3.3)
    hush = stretch(hush_db=-4.5, lead_s=.01)
    slime = (fizz(shimmer) + squelch(shimmer)) * hush
    return table() + slime + air() + pops()


def record(dry):
    """Band limit: linear-phase low-pass."""
    edge_hz = 15750
    lowpass = signal.firwin(511, edge_hz, window=("kaiser", 9), fs=SR)
    return signal.oaconvolve(dry, lowpass[None], "same")


dry = scene()
out = record(dry)
pcm_store(out)
```